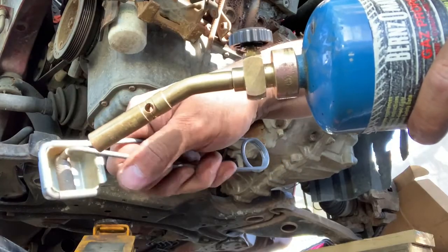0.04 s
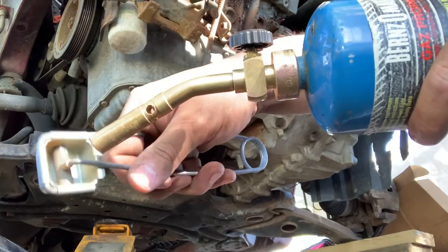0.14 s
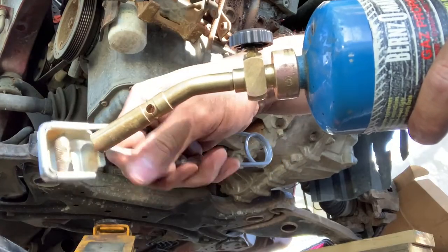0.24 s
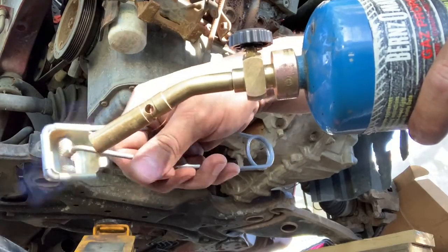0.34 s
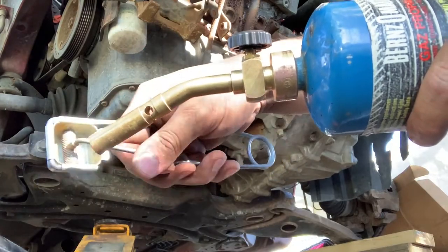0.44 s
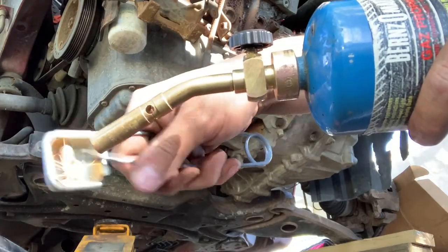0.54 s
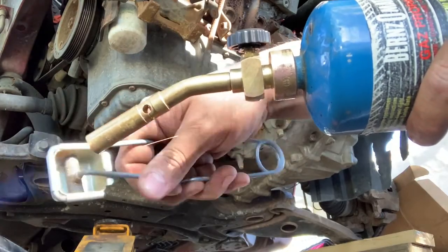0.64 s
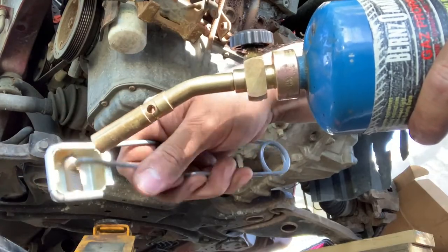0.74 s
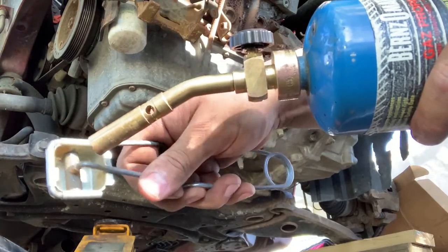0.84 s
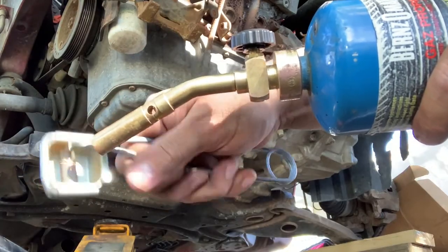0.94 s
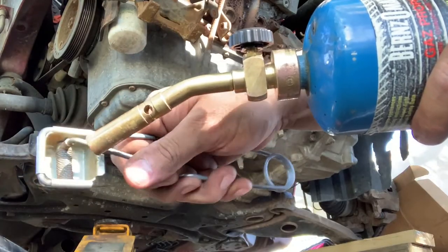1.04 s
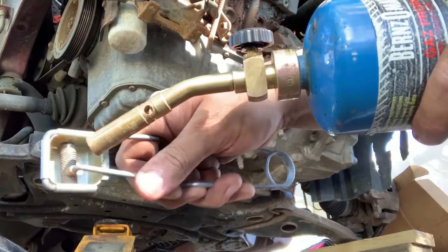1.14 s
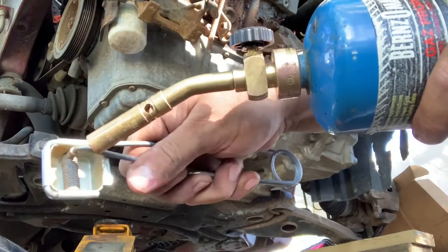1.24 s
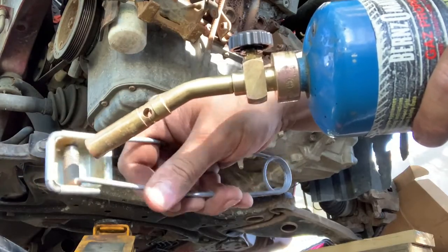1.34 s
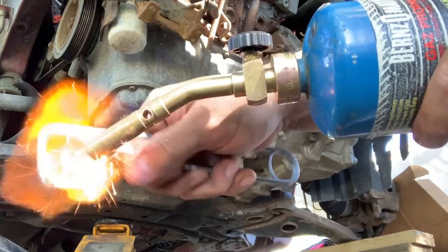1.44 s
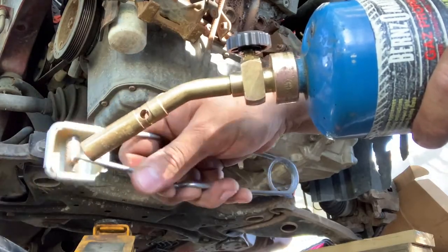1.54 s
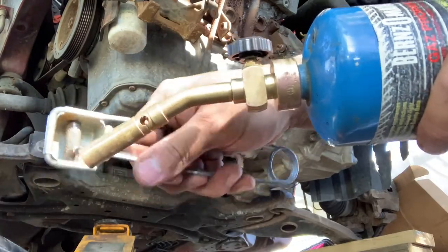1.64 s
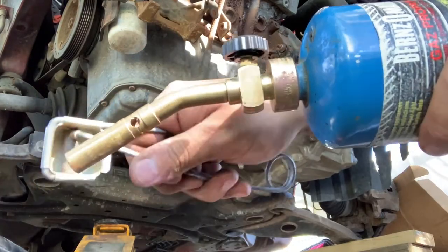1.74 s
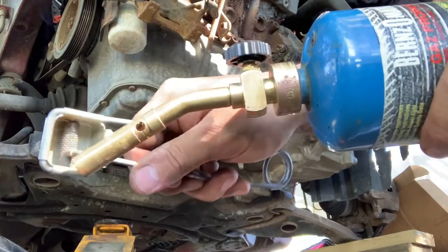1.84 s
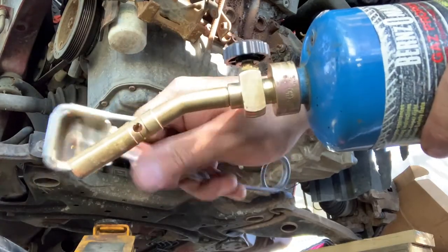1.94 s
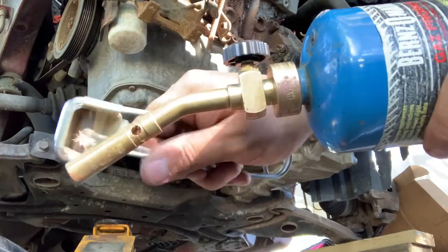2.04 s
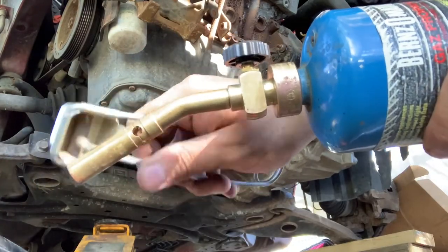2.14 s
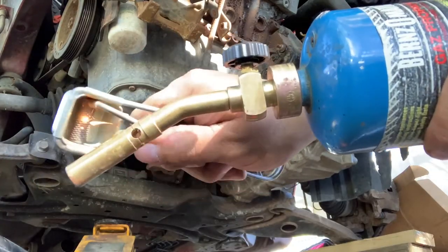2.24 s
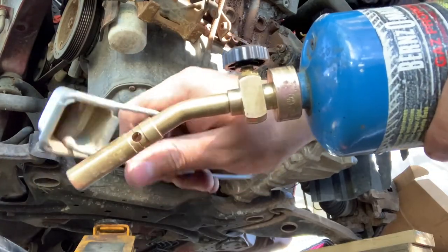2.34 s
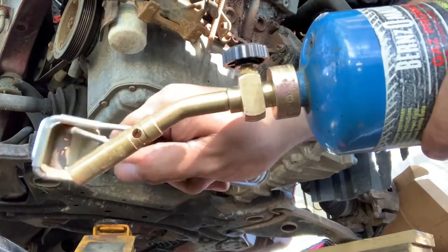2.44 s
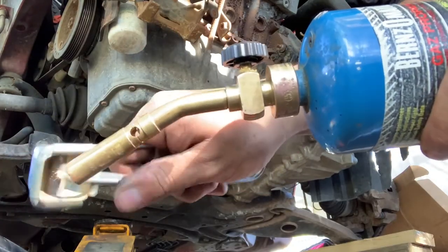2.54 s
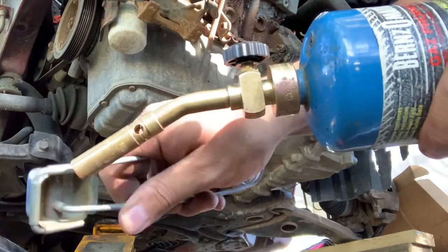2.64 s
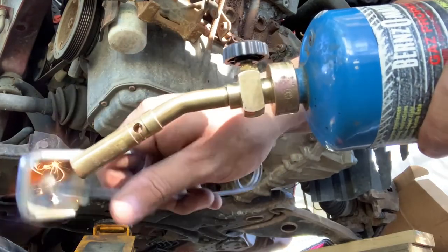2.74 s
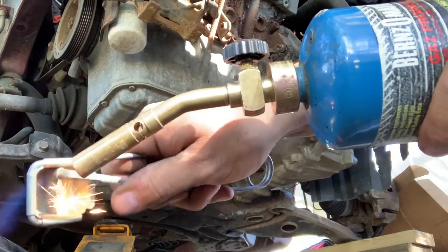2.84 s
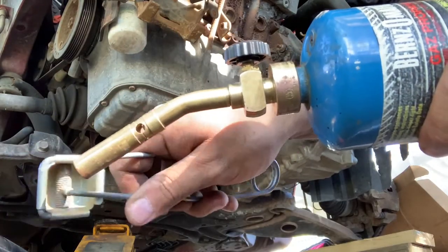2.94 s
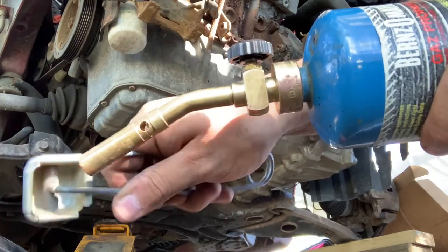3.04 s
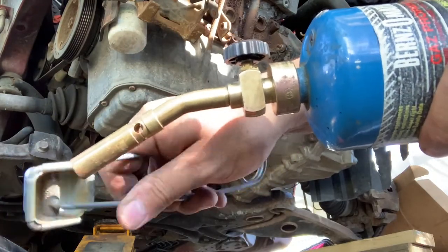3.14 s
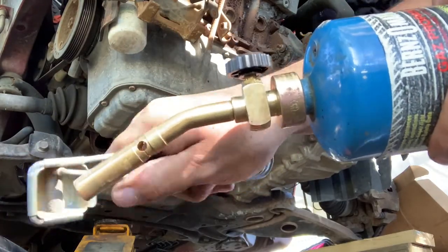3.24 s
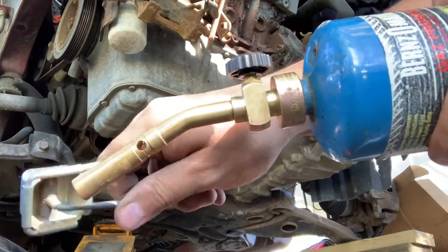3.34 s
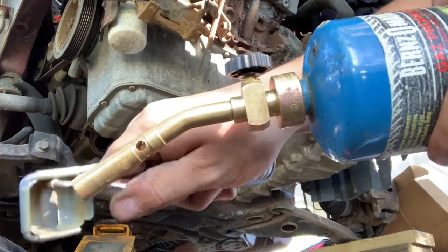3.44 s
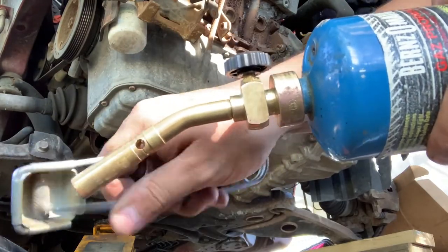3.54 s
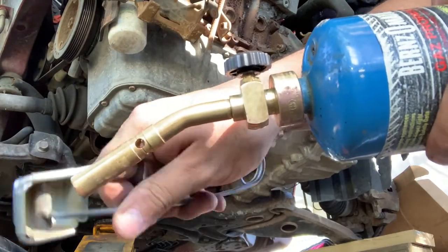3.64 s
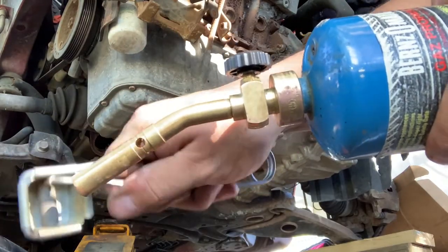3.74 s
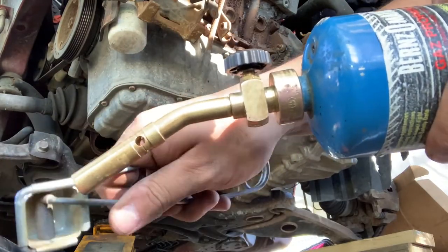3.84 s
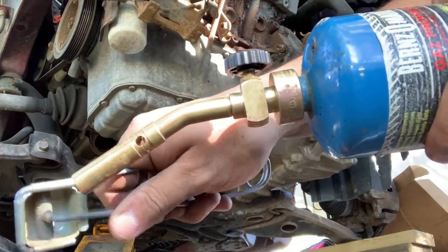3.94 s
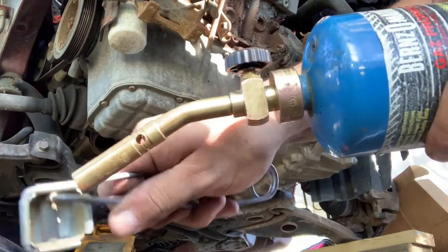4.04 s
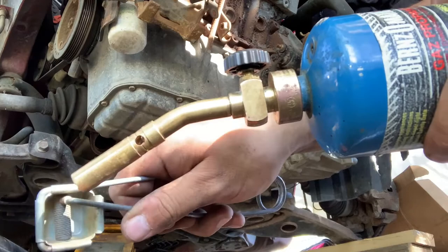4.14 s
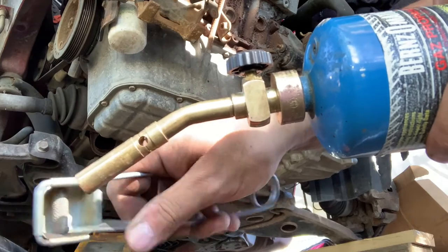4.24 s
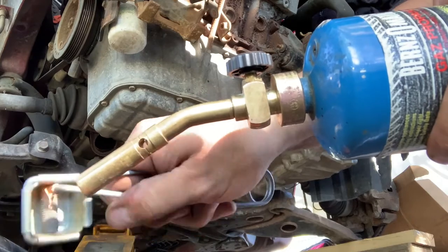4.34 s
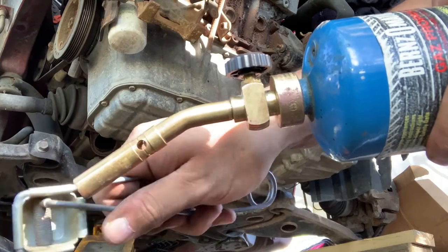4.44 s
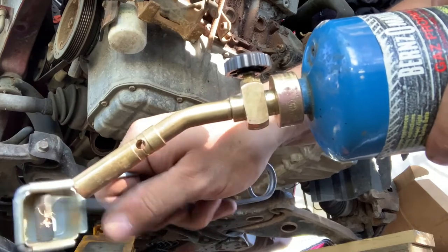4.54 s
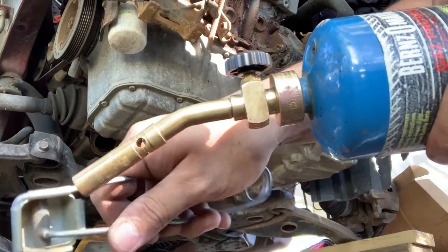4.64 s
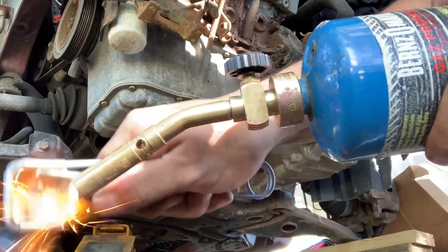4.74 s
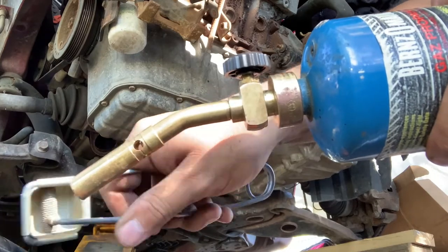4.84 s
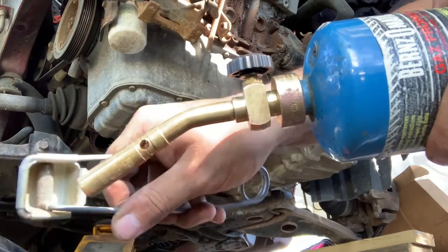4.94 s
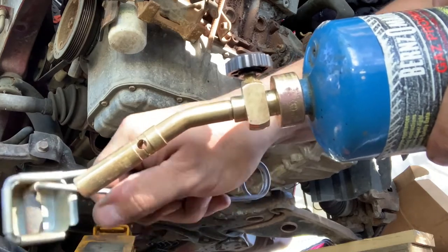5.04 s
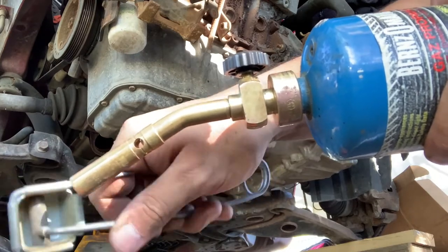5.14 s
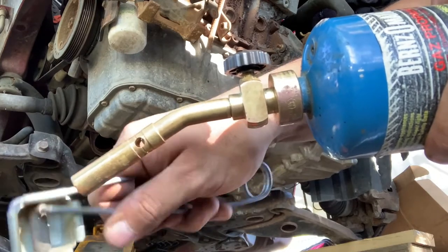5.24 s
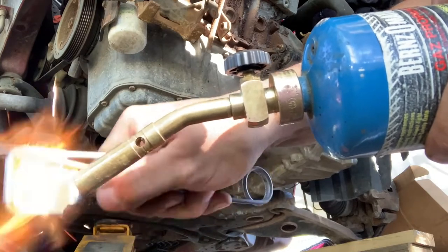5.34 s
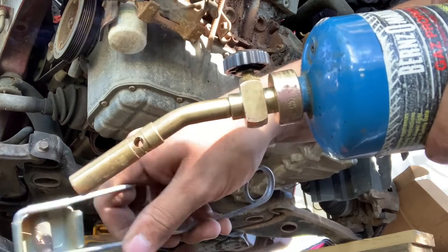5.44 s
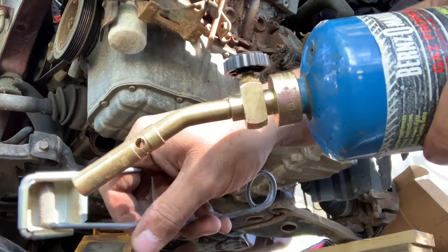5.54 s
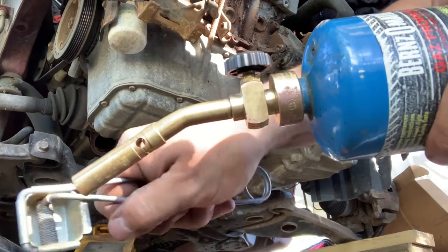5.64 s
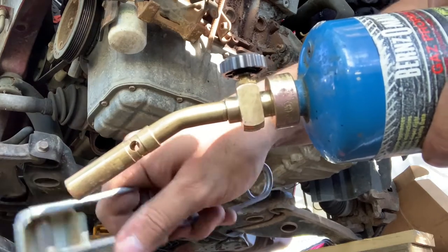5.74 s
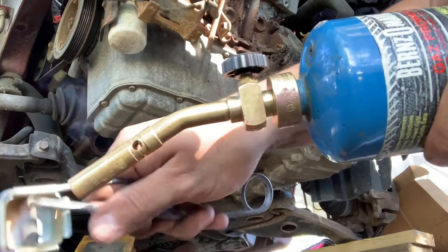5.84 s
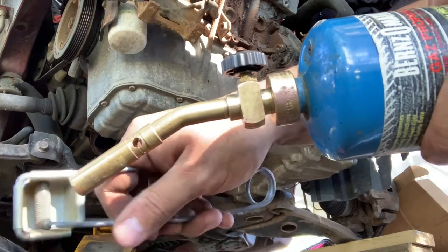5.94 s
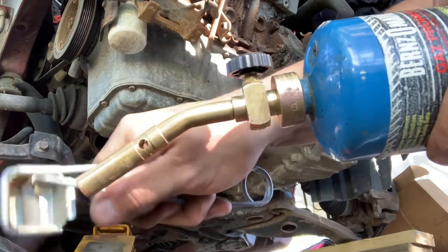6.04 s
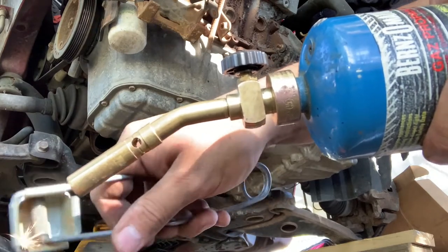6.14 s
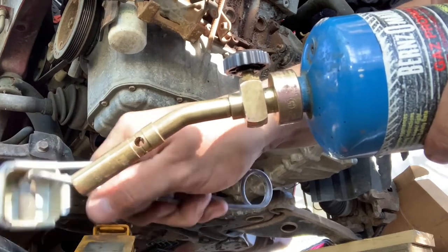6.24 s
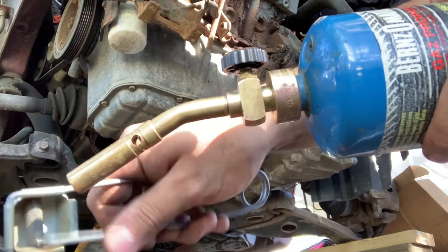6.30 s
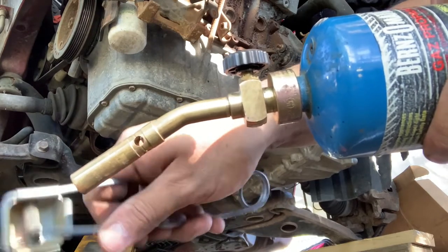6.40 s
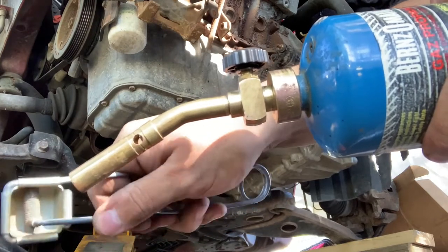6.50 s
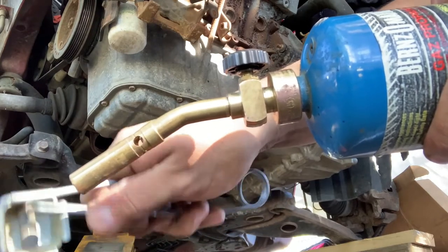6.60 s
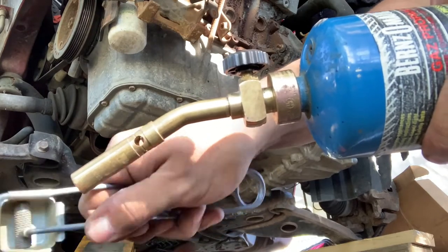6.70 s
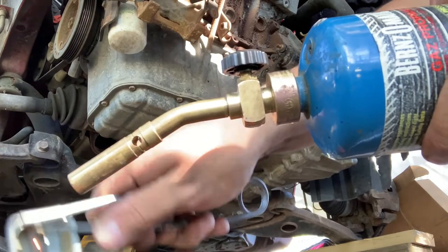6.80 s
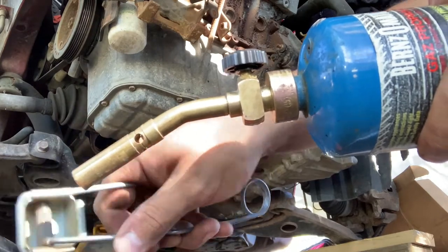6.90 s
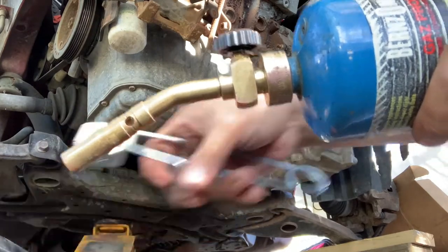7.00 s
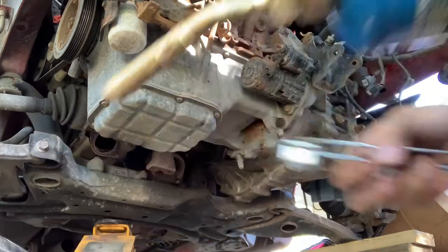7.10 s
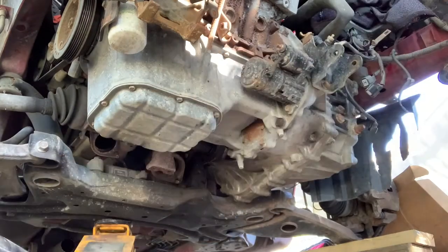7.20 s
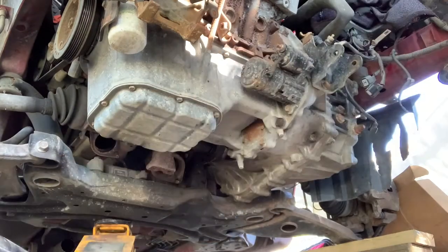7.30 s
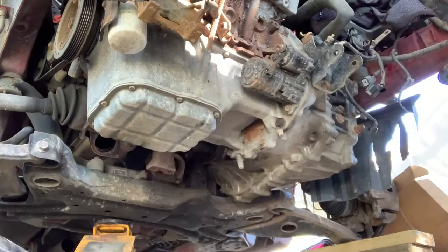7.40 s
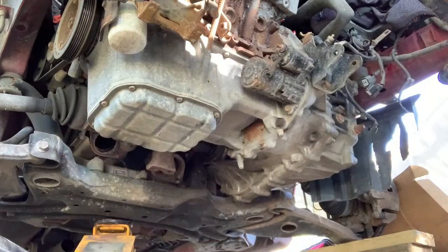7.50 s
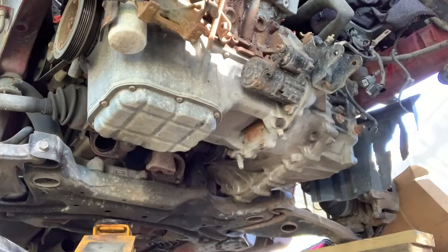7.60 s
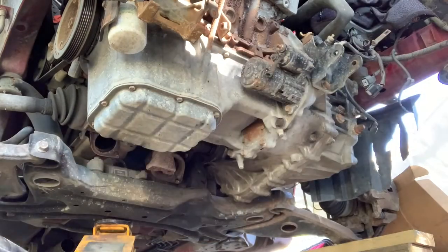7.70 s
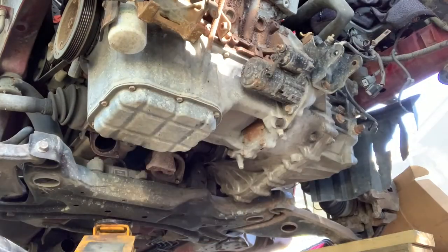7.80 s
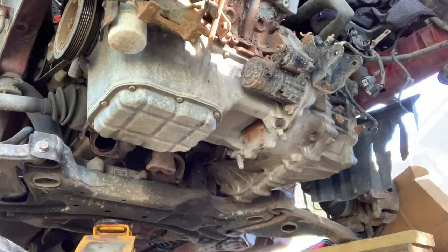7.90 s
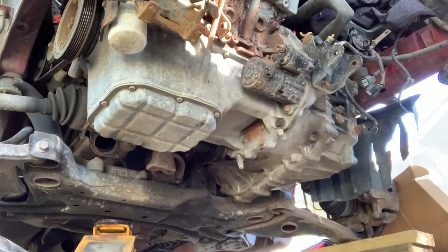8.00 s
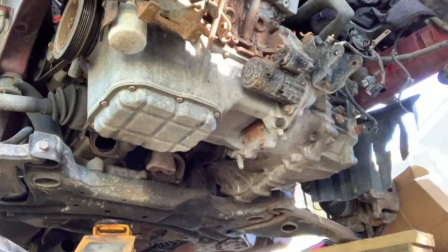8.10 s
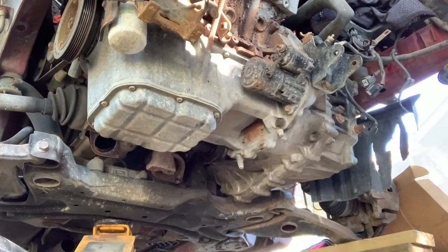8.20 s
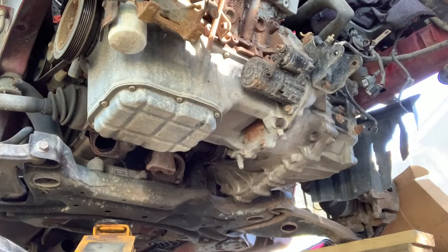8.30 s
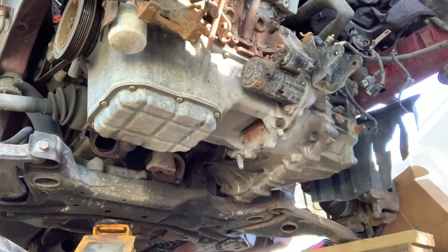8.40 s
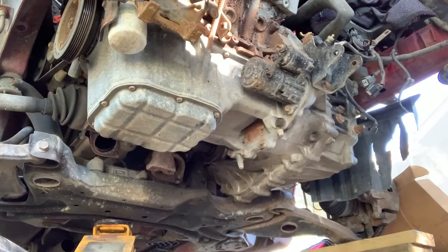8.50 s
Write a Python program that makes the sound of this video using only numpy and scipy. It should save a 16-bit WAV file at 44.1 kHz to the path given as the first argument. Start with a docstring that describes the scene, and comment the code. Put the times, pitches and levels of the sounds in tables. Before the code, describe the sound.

Close up in a garage, a flint striker is scraped back and forth beside a gas torch nozzle, giving crisp, high metallic rasps and tiny wire squeals. Thin gas hiss runs beneath. Now and then the gas catches with a loud, low pop and a short flutter that blows out. Scraping gets denser, stops near seven seconds, and after a quiet gap a soft pop leaves a small flame holding.

```python
"""Quick metallic scratches come first: a flint striker is worked to and fro at a gas torch in a garage.
Each stroke drags the flint over a steel file in a tin cup: noise from the teeth rings the parts.
Now and then the gas catches with a pop, a swing that slows down; noise makes the fluttering flame that blows out.
Shaped noise also makes the unlit jet's hiss, the brushing fingers and the far rumble; a wavering tone hums.
At the end the flame holds."""
import sys
import numpy as np
from scipy import signal
from scipy.fft import rfft, irfft, next_fast_len
from scipy.io import wavfile
from scipy.ndimage import uniform_filter1d

SR = 44100
rng = np.random.default_rng(int(sys.argv[2]) if len(sys.argv) > 2 else 0)


def to_wav(sig):
    """Store sig (one row per channel, or 1-D mono) as 16-bit WAV at the path in sys.argv[1].

    Samples outside -1..1 are clipped; the rate is SR.
    """
    pcm = np.clip(np.atleast_2d(sig), -1, 1) * 32767
    pcm = np.round(pcm).astype(np.int16)
    wavfile.write(sys.argv[1], SR, pcm.T)  # frames by channels


N = 377496
PADDED = next_fast_len(N, real=True)   # length that makes the Fourier transform fast
HZ = np.fft.rfftfreq(PADDED, 1 / SR) + 1   # shifted by 1 so that its logarithm exists

# In every noise colour below, level_db gives only the shape: the noise is then scaled to rms 1.
# gas catching: start_s, peak_db (before a trim), turns_per_e_fold of time, decay_ms,
# crack_db (relative to the swing), ember_db (roar left behind)
CATCHES = [(.23,-2,.67,9.6,-11.5,-31),(.535,-8.5,.9,19,-9,-30),(1.414,-4.5,.98,17,-11,-38),(2.666,-7.5,.98,11.6,-9.5,-34),
           (3.948,0,.81,12,-14.5,-27),(4.706,-9,.76,15,-17,-25),(5.316,-5.5,.82,7.8,-11.5,-22),(5.77,-19,.98,16,-15,-40),
           (5.981,-13,.88,16,-9,-28),(6.309,-12.5,.92,19,-8,-22),(6.69,-30,.95,16,-16,-60),(7.228,-31,.73,18,-13.5,-56),(8.292,-24.5,.86,30,-24,-41)]
# colour of the flame's roar: pitch_hz, level_db
ROAR_COLOUR = [(200, -52.5), (350, -6.5), (500, -2), (850, -0.5), (1200, -9), (1800, -40)]
# colour of the flame's bright part: pitch_hz, level_db
BRIGHT_COLOUR = [(1000, -7.5), (1500, -1.5), (2300, -1), (3200, -6), (5000, -13.5), (6800, -19),
                 (8700, -27), (12000, -29.5)]
# difference between the two microphone ports: pitch_hz, left_minus_right_db
PORT_BALANCE_DB = [(60, -2.0), (110, -2.0), (200, -1.5), (380, -1.5), (700, -0.5), (1290, 0.5),
                   (2380, -1.5), (4400, -4.0), (8120, -1.5), (15000, -4.5)]


def striker():
    """File teeth snag the flint for a few ms; the spring arm squeals and the snags ring file and cup."""
    # ringing modes of the parts, each: pitch_hz, width_hz, level_db (relative within the part)
    file_modes = [(8720, 470, -7.5), (9360, 280, -1.5), (9810, 250, -8), (10160, 250, -4),
                  (10980, 1900, -7.5), (13800, 2100, -19), (14300, 870, -15.5)]
    cup_modes = [(5540, 690, 12), (6624, 380, 5), (7970, 120, 5), (5690, 1840, 7.5)]
    knock_modes = [(1300, 950, -2.5), (2266, 1500, 3.5), (3306, 200, 11), (3550, 90, 4.5), (3800, 290, 8.5)]
    # wire twang that comes with the arm, same columns
    snap_modes = [(11200, 900, -3.5), (11560, 280, -1), (12200, 250, 2), (13000, 700, 1.5),
                  (14100, 1200, -7.5), (15500, 1000, -3)]
    arm_hz, arm_ring_ms = 11908, 0.92

    # about 6000 snags a second, of random strength and sign, over a steady scratch
    snags = rng.random(N) < 6000 / SR
    strength = from_db(6.9 * np.minimum(rng.exponential(1, N), 3))
    teeth = rms_one(snags * strength * rng.choice([-1, 1], N))
    teeth = teeth + .5 * rng.standard_normal(N)

    drive = np.full((4, N), 1e-18)   # arm, file, cup, knock
    pan = np.full(N, 3.5)
    for s, *parts_db, ms, pan_db in contacts():
        t = np.arange(int(.04 * SR)) / SR / (max(ms, 1) / 1000)   # in contact lengths
        press = np.minimum(t / 0.38, 1) / (1 + t ** 2.9)   # bite, even drag, release
        i = round(s * SR)
        drive[:, i:i + len(t)] += from_db(parts_db)[:, None] * press
        pan[i:i + len(t)] = pan_db

    # the arm rings on after release
    hold = np.exp(-1000 / (arm_ring_ms * SR))
    ring = signal.lfilter([1 - hold], [1, -hold], drive[0])
    swing = np.maximum(ring, 1.6 * drive[0])
    out = swing * wavering(arm_hz, wobble=.005, rate_hz=200, flicker_db=1.5)

    parts = (snap_modes, file_modes, cup_modes, knock_modes)
    for push, modes, gain_db in zip(drive, parts, (-3.5, 3.5, 1.0, 0.5)):
        out = out + from_db(gain_db) * ring_body(teeth * push, modes) / np.std(ring_body(teeth[:SR], modes))
    return ports(out) * from_db(.5 * pan * [[1], [-1]])


def contacts():
    """List the strokes with their body knock and side, the light touch before firm ones, and a tap."""
    # flint strokes, levels of the push before each part's gain:
    # start_s, spring_arm_db, file_db, cup_db, contact_ms
    strokes = [(.0427,-47,-56,-50,4),(.2184,-42,-47,-43,5.2),(.513,-41,-50,-40,4.5),(.531,-44,-50,-45,5),(.7125,-47,-49,-47,7.5),
               (1.0146,-41,-52,-54,3.4),(1.1329,-47,-49,-54,3.2),(1.6009,-49,-55,-53,8.7),(1.7101,-44,-46,-55,4.2),(2.1217,-43,-51,-67,4.2),
               (2.1783,-42,-54,-70,6),(2.6405,-44,-42,-53,9),(3.0186,-42,-44,-45,4.5),(3.2825,-42,-52,-52,4),(3.737,-51,-54,-50,3.4),(3.9383,-45,-45,-47,5),
               (4.278,-53,-54,-46,7),(4.42,-46,-52,-49,2.8),(4.5946,-57,-43,-42,2.2),(4.8016,-41,-65,-65,3),(5.594,-41,-43,-41,1.3),(5.7145,-54,-47,-45,5.5),
               (6.4723,-53,-51,-50,6.7),(7.2363,-65,-59,-54,36),(7.7257,-50,-58,-50,6.4),(8.2086,-55,-64,-52,8),
               (.071,-26,-31,-37,2.8),(.121,-33,-43,-46,4),(.133,-33,-44,-53,5.5),(.228,-38,-29,-31,1.6),(.283,-33,-38,-53,2.7),
               (.3086,-13.5,-29,-50,1.8),(.334,-37,-62,-63,6),(.453,-20.5,-44,-63,5.2),(.4616,-34,-35,-34,4.8),(.5221,-34,-36,-44,4.2),
               (.5874,-18,-28,-43,4),(.728,-52,-64,-37,3.2),(.785,-27,-33,-38,2.9),(.9057,-43,-45,-39,8),(1.0403,-30,-27.5,-36,3.3),
               (1.066,-33,-49,-50,2.8),(1.147,-44,-38,-47,3.7),(1.16,-34,-49,-43,4.5),(1.1727,-60,-50,-34,1.4),(1.1808,-41,-48,-39,2.2),
               (1.2586,-24,-27,-32,3.8),(1.2796,-27.5,-38,-37,6.4),(1.411,-29.5,-34,-33,2.7),(1.4654,-35,-49,-56,2.7),(1.4776,-17,-25,-42,2.8),
               (1.521,-23.5,-41,-65,5),(1.538,-30,-39,-35,4.2),(1.623,-37,-36,-38,5),(1.643,-24,-34,-30,2.7),(1.649,-47,-49,-36,2.9),
               (1.7376,-31,-31,-40,5.3),(1.759,-32,-44,-66,3.9),(1.8372,-23.5,-27.5,-29.5,3.6),(1.9173,-26,-34,-43,4.2),(1.9453,-39,-40,-41,6.3),
               (1.999,-40,-48,-58,5.7),(2.0212,-35,-36,-41,4.8),(2.0328,-28.5,-36,-34,4),(2.0962,-25.5,-26.5,-44,3.7),(2.198,-28,-35,-34,5.4),
               (2.278,-24.5,-25.5,-43,4.9),(2.3004,-39,-40,-39,5.8),(2.3741,-31,-33,-43,3.8),(2.3808,-35,-39,-36,6),(2.4532,-28,-24.5,-39,3.6),
               (2.519,-39,-43,-47,7),(2.535,-43,-42,-34,2.4),(2.5921,-27,-27,-35,3.7),(2.6509,-45,-49,-35,1.7),(2.7121,-25,-25.5,-55,3.5),
               (2.7223,-30,-49,-41,2.7),(2.7922,-37,-53,-59,6.4),(2.8052,-27.5,-35,-47,5),(2.84,-64,-46,-31,1.2),(2.8637,-29,-29,-36,2.6),
               (2.8888,-30,-43,-51,4.5),(3.0253,-33,-43,-34,5),(3.0999,-29,-25,-33,3.5),(3.1855,-36,-32,-36,3.5),(3.2671,-33,-32,-34,3.6),
               (3.353,-46,-43,-48,9),(3.369,-48,-46,-33,2.3),(3.4444,-38,-27,-37,4.2),(3.4734,-41,-39,-42,4.9),(3.526,-30,-35,-42,6.5),
               (3.538,-45,-47,-29.5,1.4),(3.5997,-28.5,-28.5,-34,4.4),(3.6305,-39,-43,-59,2.7),(3.6622,-35,-37,-50,4.7),(3.6725,-35,-43,-37,6.8),
               (3.845,-36,-27,-34,4.1),(3.9237,-42,-38,-46,3.5),(4.196,-38,-30,-38,4),(4.2075,-40,-45,-42,5.4),(4.221,-36,-37,-33,4.1),
               (4.2882,-41,-40,-37,3.3),(4.3037,-34,-44,-36,6.5),(4.3807,-57,-53,-38,1.7),(4.447,-23.5,-24.5,-29,3.5),(4.4574,-39,-45,-53,4.4),
               (4.511,-39,-40,-43,9),(4.527,-44,-48,-30,2.2),(4.6111,-25,-22.5,-28,3.2),(4.6744,-36,-48,-53,2),(4.7004,-24,-27.5,-29,4.2),
               (4.7882,-24.5,-26,-56,3.5),(4.8106,-28,-38,-46,4.2),(4.856,-26,-38,-33,3.2),(4.961,-46,-46,-41,6.6),(4.9778,-43,-50,-32,1.9),
               (5.073,-27,-26,-35,4.8),(5.1283,-38,-37,-41,5),(5.1388,-38,-45,-37,8.5),(5.2295,-21.5,-24.5,-28.5,3.9),(5.2437,-40,-45,-37,5.3),
               (5.2844,-45,-42,-43,5),(5.2976,-24,-31,-41,2.7),(5.3025,-35,-41,-34,4.4),(5.3763,-19,-22.5,-41,4.7),(5.394,-34,-41,-36,4.6),
               (5.5813,-41,-43,-39,11),(5.6662,-27.5,-23,-28.5,4),(5.7518,-25,-29,-24.5,3.9),(5.8385,-13,-20,-34,3.7),(5.9196,-32,-36,-30,3.4),
               (5.9713,-26,-30,-26,4.4),(6.0522,-18,-24,-41,3.2),(6.0744,-36,-41,-40,4.9),(6.1698,-28,-34,-38,3.2),(6.178,-34,-39,-35,4.7),
               (6.245,-17.5,-30,-34,4.4),(6.2694,-39,-51,-36,4),(6.2962,-47,-50,-33,2),(6.3046,-33,-39,-43,4.6),(6.3176,-31,-45,-38,4),
               (6.381,-20.5,-25,-42,6),(6.4015,-29,-39,-32,5),(6.499,-23,-29.5,-35,4.5),(6.5222,-35,-43,-25.5,3.8),(6.5902,-49,-53,-36,1.5),
               (6.6031,-25,-27,-26,5),(6.6508,-36,-43,-61,3.7),(6.6698,-40,-65,-57,2),(6.7167,-26,-32,-25.5,3.7),(6.7563,-65,-67,-44,4.2),
               (6.7866,-50,-37,-54,2.3),(6.8405,-22.5,-33,-14,1.6),(6.8899,-44,-50,-40,3.2),(6.925,-67,-58,-44,4.5),
               (7.574,-47,-43,-49,11),(7.6444,-44,-44,-50,9),(7.6616,-42,-48,-44,5.6),(7.7045,-49,-55,-55,9),(7.7162,-45,-54,-52,4.3),
               (7.979,-61,-54,-54,12),(8.2804,-45,-44,-45,8)]
    # a dull tap: start_s, arm_db, file_db, cup_db, knock_db, contact_ms
    tap = (8.199, -60, -56, -51, -44, 4.5)
    # the body knock follows file and cup, up to a limit
    knock_re_file_db, knock_re_cup_db, knock_most_db = -18, -17, -40
    # left minus right, on top of the port balance; later the striker is held aside
    pan_db, pan_spread_db = -2.0, 2.2
    away_s, away_pan_db, away_knock_db = 7.4, 6.0, -12
    # a firm stroke is led by a light touch: (arm, file, cup, knock) levels
    firm_db, lead_s, lead_spread_s, lead_db = -36, .0105, .002, (-53, -57, -52, -64)

    rows = [(*tap, away_pan_db)]
    for (s, arm, file, cup, ms), chance in zip(strokes, rng.standard_normal((len(strokes), 6))):
        away = s > away_s
        both = np.hypot(from_db(file + knock_re_file_db), from_db(cup + knock_re_cup_db))
        knock = min(20 * np.log10(both), knock_most_db) + away * away_knock_db
        side = (away_pan_db if away else pan_db) + pan_spread_db * chance[0]
        if file > firm_db:
            touch_s = s - lead_s + lead_spread_s * chance[1]
            rows.append((touch_s, *(lead_db + 3.0 * chance[2:]), 3.0, side))
        rows.append((s, arm, file, cup, knock, ms, side))
    return rows


def pops():
    """The pocket of gas swells at once and rocks the air: a swing whose cycles stretch, led by a crack."""
    out, t = np.zeros(N), np.arange(int(.08 * SR)) / SR
    crack = noise(BRIGHT_COLOUR) + 1.4 * noise(ROAR_COLOUR)
    for s, peak_db, sag, ms, crack_db, _ in CATCHES:
        turns = 50 * t + sag * np.log(1 + t / 0.000523)   # fast at first, settling towards 50 Hz
        swell = np.minimum(t / 0.0017, 1) * np.exp(-(t * 1000 / ms) ** 2.02)
        swing = -np.sin(2 * np.pi * turns) * swell
        i = round(s * SR)
        burst = from_db(crack_db) * crack[i:i + len(t)] * np.exp(-t / 0.0046)
        out[i:i + len(t)] += from_db(peak_db - 2.5) * (swing + burst)
    return out


def flame():
    """Turbulent burning: the same fast lumps shake roar, bright part and flutter; the held flame sings in the tube."""
    # licks of flame: start_s, start_db, crest_s, crest_db, out_s, out_db,
    # bright_start_db, bright_end_db (both relative to the roar)
    licks = [(.25,-45,.286,-26,.288,-27,-1.5,-7),(.297,-41,.331,-25,.342,-27.5,-3,-8),(.57,-39,.6,-29,.618,-27,-4,-3),
             (1.426,-36,1.438,-26.5,1.452,-32,0,-8),(2.676,-33,2.69,-27.5,2.728,-30.5,9,-3),(2.738,-36,2.808,-21,2.826,-28,-2,-5),
             (3.969,-41,3.993,-36,4.03,-32,2.5,-8),(4.03,-30,4.05,-22.5,4.094,-22,-8,-4.5),(4.72,-36,4.73,-32,4.734,-34,3,8),
             (4.745,-44,4.782,-21,4.784,-22,1.5,-8),(5.336,-36,5.346,-26.5,5.363,-25.5,4,-2.5),(5.372,-37,5.388,-27,5.412,-24,-3,-4),
             (5.766,-48,5.772,-22,5.826,-26,-4,-3),(5.997,-35,6.03,-34,6.034,-34,7,1.5),(6.03,-33,6.082,-25,6.085,-26,1.5,-5),
             (6.165,-80,6.185,-45,6.187,-45,4,-3),(6.34,-42,6.365,-22,6.372,-27,1.5,-5)]
    # colour of the low flutter: pitch_hz, level_db
    flutter_colour = [(60, -36.5), (110, -9.5), (200, 11), (330, 8), (500, -30.5)]
    # the flame holds in the tube: time_s, level_db
    held = [(8.28, -60), (8.286, -73), (8.296, -29.5), (8.368, -43), (8.396, -38.5), (8.56, -42.5)]
    # colour of the flame in the tube: pitch_hz, level_db
    tube_colour = [(200, -25), (380, -8), (560, -0.5), (800, -11), (900, -18.5), (1200, -15), (1420, -7),
                   (1700, -17), (1950, -11.5), (2200, -24.5), (2700, -25), (3000, -33), (5800, -34),
                   (6700, -25.5), (8500, -29), (11000, -50)]
    # stereo width: pitch_hz, side_db (relative to the middle)
    flame_width = [(60, -16), (110, -16), (200, -43), (380, -17), (700, -20), (1290, -4), (2380, -35.5),
                   (4400, -7), (8120, -17), (15000, 2)]
    ember_edge_db, ember_fade_db_per_s = -1.5, 800   # bright part of the roar a pop leaves; its fade
    die_db_per_s, dull_db_per_s = 1350, 300   # blown out, a lick dies, its bright part faster
    flutter_db, flutter_rise = -9, .4   # relative to the roar at the crest; dB gained per dB below it

    rows = [(*lick, die_db_per_s) for lick in licks]
    for s, *_, db in CATCHES:
        ember = (s + .008, db, s + .009, db, s + .01, db)
        rows.append((*ember, ember_edge_db, ember_edge_db, ember_fade_db_per_s))

    gains, t = np.zeros((3, N)), np.arange(N) / SR   # roar, bright, flutter
    for start, start_db, crest, crest_db, out, out_db, *edge_db, die in rows:
        at = slice(round(start * SR), round((out + .06) * SR))
        burning_db = np.interp(t[at], [start, crest, out], [start_db, crest_db, out_db])
        after = np.clip(t[at] - out, 0, None)   # time since it went out
        roar_db = burning_db - die * after
        bright_db = np.interp(t[at], [start, out], edge_db) - dull_db_per_s * after
        low_db = flutter_db + flutter_rise * np.minimum(crest_db - roar_db, 25)
        new_gains = from_db([roar_db, roar_db + bright_db, roar_db + low_db])
        gains[:, at] = np.hypot(gains[:, at], new_gains)
    gains = uniform_filter1d(gains, size=180)   # no burst starts in a jump

    width = from_db(at_hz(flame_width))
    lumps = rms_one(from_db(2.3 * drift(120)))
    colours = (ROAR_COLOUR, BRIGHT_COLOUR, flutter_colour)
    body = sum(gain * spread(colour, width) for gain, colour in zip(gains, colours))
    return lumps * body + from_db(in_time(held, -120)) * spread(tube_colour, width)


def rubs():
    """Fingers and tools brush softly: low and high noise under a rounded swell."""
    # scuffs: start_s, level_db (of the low noise, before the swell), length_ms, brightness_db (high re low)
    scuffs = [(3.93, -40.5, 28, 2.5), (5.185, -49.5, 39, -6), (5.545, -48, 43, -8), (5.92, -46.5, 34, -10),
              (6.69, -47, 32, -4), (7.225, -48.5, 32, -2), (7.46, -57, 51, -3), (7.51, -49.5, 17, -18),
              (2.641, -48.5, 40, 8), (0.49, -48, 42, 1), (5.285, -43.5, 46, 0), (1.39, -48, 30, 4),
              (0.203, -49.5, 30, 4), (5.4, -48, 8, 1), (6.143, -50, 9, 3), (5.955, -49.5, 19, 5)]
    # colour of the low noise: pitch_hz, level_db
    low_colour = [(300, -30), (600, 3), (1500, -10), (3000, -3), (4500, -13)]
    # colour of the high noise: pitch_hz, level_db
    high_colour = [(2500, -16), (4000, -5), (6000, 5), (8000, -11), (14000, -12), (16000, -30)]
    low, high, out = noise(low_colour), noise(high_colour), np.zeros(N)
    for s, level_db, ms, bright_db in scuffs:
        i, n = round(s * SR), int(ms * SR / 1000)
        scuff = low[i:i + n] + from_db(bright_db) * high[i:i + n]
        out[i:i + n] += from_db(level_db) * np.hanning(n) ** .5 * scuff
    return out


def unlit_jet():
    """Gas rushing from the nozzle hisses in two bands of noise, shaded as the cup moves before it."""
    # levels before the slow wavering: time_s, jet_hiss_db, upper_hiss_db
    shading = [(0,-54,-48),(.3,-50,-47),(.62,-54,-51),(1,-57,-47.5),(1.48,-51,-46),(1.65,-53,-49),(2.4,-50.5,-48),(2.72,-55,-44),
               (2.9,-51.5,-52),(3.07,-52,-47),(3.33,-55,-49.5),(3.53,-61,-43),(3.72,-58,-44.5),(4.03,-58,-45),(4.12,-53,-53),(4.41,-56,-45),(4.65,-55,-44),
               (4.77,-57,-52),(4.91,-50,-48),(5.08,-59,-42.5),(5.22,-57,-43),(5.5,-51,-55),(5.79,-56,-48),(5.96,-50,-54),(6.34,-54,-46),
               (6.65,-52,-50),(6.9,-54,-47),(7.2,-51,-54),(7.36,-56,-55),(7.48,-57,-72),(7.65,-63.5,-66),(8.2,-64,-72),(8.56,-72,-78)]
    # colour of the jet hiss: pitch_hz, level_db
    hiss_colour = [(5000, -21.5), (7000, -22.5), (8300, -3.5), (8800, 0), (9150, 5.5), (9600, -5.5),
                   (10200, -5), (11500, -11), (12500, -16)]
    # colour of the upper hiss: pitch_hz, level_db
    top_colour = [(11000, -23.5), (12500, -9), (14200, -1.5), (15500, -0.5), (15900, -17), (16800, -38.5)]
    hiss_db, top_db = in_time(shading)
    hiss = from_db(hiss_db) * diffuse(hiss_colour, patchy_db=2.5)
    return hiss + from_db(top_db) * diffuse(top_colour, patchy_db=1.9)


def garage():
    """Far rumble and the air of the garage: wide noise whose treble has its own level curve."""
    # levels before the slow wavering: time_s, rumble_db, air_db
    levels = [(0,-54,-65),(.8,-52,-62),(1.2,-51,-60),(2.4,-51,-60),(3.5,-50,-61),(4.5,-52,-61),(5.5,-48.5,-58),(5.8,-53,-59),(6.6,-51,-55),(6.9,-51,-62),(7.35,-49.5,-62),(7.55,-49.5,-57),(7.9,-51,-58),(8.2,-50,-55),(8.56,-44,-50)]
    # colour of the rumble: pitch_hz, level_db
    rumble_colour = [(18, -78.5), (30, -47), (75, -15), (90, -7), (108, -0.5), (169, -5.5), (203, -6),
                     (330, -17), (700, -32), (910, -47.5), (1540, -120)]
    # colour of the air: pitch_hz, level_db
    air_colour = [(300, 3.5), (600, 10.5), (1100, 3.5), (2200, 3.5), (3500, -5.5), (5500, -6.5),
                  (7500, -9.5), (9000, -2)]
    # change of the air's treble: time_s, change_db
    treble_change = [(0, 0.1), (7.7, -1.5), (7.77, -7), (8.18, -7), (8.3, -2.5), (8.56, -3)]
    rumble_db, air_db = in_time(levels)
    air = diffuse(air_colour, patchy_db=2.17)
    treble = signal.sosfiltfilt(signal.butter(4, 2800, "high", fs=SR, output="sos"), air)
    air = air + (from_db(in_time(treble_change)) - 1) * treble
    return from_db(rumble_db) * diffuse(rumble_colour, patchy_db=0.57) + from_db(air_db) * air


def low_hum():
    """A low hum: one tone that wavers in pitch and level."""
    # middle of the wavering: time_s, pitch_hz, level_db
    course = [(0, 114.6, -49.5), (2, 111, -55), (3.5, 109, -58), (4.5, 104.5, -51.5), (5.5, 137.2, -62.5),
              (6, 149.3, -65), (7, 155, -60), (8.56, 144.9, -49.5)]
    hum_hz, hum_db = in_time(course)
    return from_db(hum_db) * wavering(hum_hz, wobble=0.03945, rate_hz=7.92, flicker_db=4.0)


def wavering(hz, wobble, rate_hz, flicker_db):
    """A tone whose pitch and level wander, rms near 1."""
    level = np.sqrt(2) * from_db(flicker_db * drift(rate_hz))
    turns = np.cumsum(hz * (1 + wobble * drift(rate_hz))) / SR
    return level * np.sin(2 * np.pi * turns)


def ring_body(x, modes):
    """A struck part rings on all its modes, with alternating sign."""
    out = 0
    for k, (hz, width_hz, db) in enumerate(modes):
        out = out + (-1) ** k * from_db(db) * resonate(x, hz, width_hz)
    return out


def resonate(x, hz, width_hz):
    """Two-pole resonance, gain 1 on top; a narrow one rings longer."""
    r = np.exp(-np.pi * width_hz / SR)
    top = np.array([1, 0, -1]) * (1 - r * r) / 2
    return signal.lfilter(top, [1, -2 * r * np.cos(2 * np.pi * hz / SR), r * r], x)


def ports(x):
    """One source as the two ports hear it, with their phase and level offsets."""
    # pitch_hz, left_lead_radians
    port_phase = [(20, 0), (780, 0), (1120, .5), (1500, -.1), (7000, .1), (8200, -.4), (8900, -1.7),
                  (11400, -1.2), (12000, -1.6), (12700, -4.2), (16500, -3.5)]
    half = from_db(at_hz(PORT_BALANCE_DB) / 2) * np.exp(.5j * at_hz(port_phase))
    return irfft(rfft(x, PADDED) * np.array([half, 1 / half]), PADDED)[:, :N]


def diffuse(spectrum, patchy_db):
    """Background noise, alike in the bass and unlike in the treble, wavering a little."""
    # pitch_hz, left_right_likeness (1 same, 0 unrelated, -1 opposite)
    likeness = [(60, 0.96), (130, 0.96), (290, 0.88), (640, 0.35), (1410, -0.36), (3100, 0.077),
                (6820, 0.16), (15000, -0.58)]
    alike = np.clip(at_hz(likeness), -1, 1)
    return spread(spectrum, np.sqrt(1 - alike), np.sqrt(1 + alike)) * from_db(patchy_db * drift(3.6))


def spread(spectrum, side_gain, mid_gain=1):
    """Stereo noise from a middle and an unrelated side draw."""
    mid, side = noise_spectrum(spectrum, count=2)
    tilt = from_db(at_hz(PORT_BALANCE_DB) / 2 * [[1], [-1]])
    return irfft(tilt * (mid_gain * mid + side_gain * side * [[1], [-1]]), PADDED)[:, :N]


def noise(spectrum):
    """Coloured noise, rms 1."""
    return irfft(noise_spectrum(spectrum, count=1)[0], PADDED)[:N]


def noise_spectrum(spectrum, count):
    """Random spectra of coloured noise of rms 1."""
    gain = from_db(at_hz(spectrum))
    draws = rng.standard_normal((2, count, len(HZ)))
    return (draws[0] + 1j * draws[1]) * gain * PADDED / (2 * np.sqrt(np.sum(gain ** 2)))


def drift(rate_hz):
    """Smooth random wandering of spread 1, made at every 40th sample and joined by lines."""
    r = np.exp(-80 * np.pi * rate_hz / SR)
    slow = signal.lfilter([1], [1, -2 * r, r * r], rng.standard_normal(N // 40 + 2002))[2000:]
    return np.interp(np.arange(N) / 40, np.arange(len(slow)), rms_one(slow))


def in_time(rows, outside=None):
    """Columns of a table as curves over time, one value a sample."""
    s, *columns = np.transpose(rows)
    return np.array([np.interp(np.arange(N) / SR, s, c, outside, outside) for c in columns])


def at_hz(points):
    """A table over pitch, read at every frequency of the Fourier transform."""
    hz, values = np.transpose(points)
    return np.interp(np.log(HZ), np.log(hz + 1), values)


def from_db(db):
    """Decibels to gain."""
    return np.exp(np.asarray(db) * np.log(10) / 20)


def rms_one(x):
    """Scale to unit rms."""
    return x / np.sqrt(np.mean(x ** 2) + 1e-20)


def scene():
    """Striker and flame close by, hiss and rumble around."""
    return striker() + ports(pops() + rubs() + low_hum()) + flame() + unlit_jet() + garage()


def record(dry):
    """The level dips briefly; bass rolls off, peaks are rounded, the microphone's top drops, then a steep cut."""
    # time_s, level_db
    dip = [(0, 1.5), (7.74, 0.5), (7.755, -17), (7.763, -17), (7.78, 0), (8.56, -3.5)]
    dry = signal.sosfilt(signal.butter(2, 50, "high", fs=SR, output="sos"), dry * from_db(in_time(dip)))
    dry = dry / (1 + np.abs(dry / .93) ** 6) ** (1 / 6)   # peaks stay below .93
    dry = signal.sosfilt(signal.cheby2(10, 14, 16000, fs=SR, output="sos"), dry)
    return signal.sosfilt(signal.cheby2(24, 70, 16979, fs=SR, output="sos"), dry)


dry = scene()
out = record(dry)
to_wav(out)
```